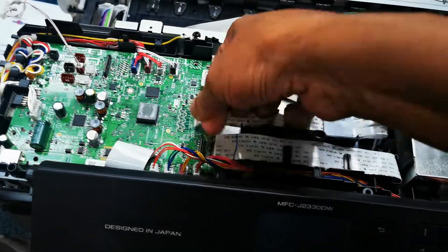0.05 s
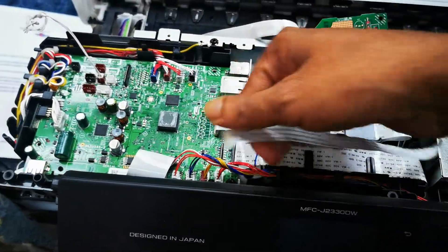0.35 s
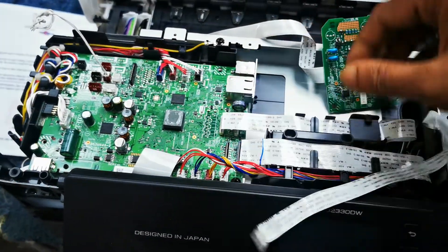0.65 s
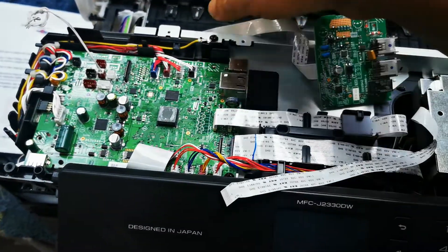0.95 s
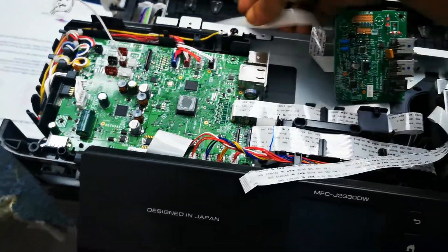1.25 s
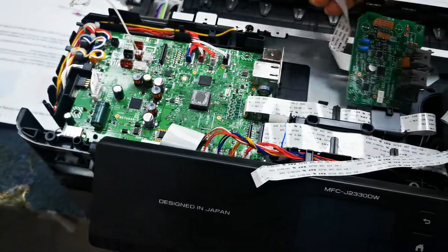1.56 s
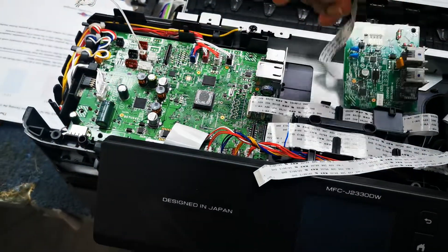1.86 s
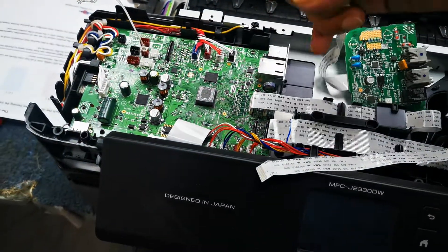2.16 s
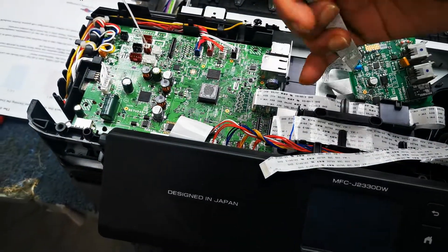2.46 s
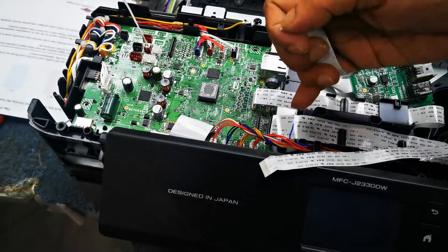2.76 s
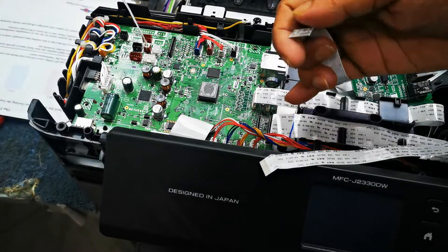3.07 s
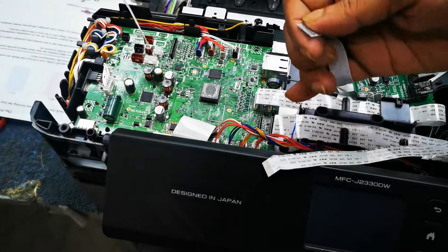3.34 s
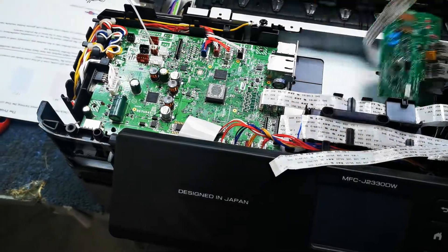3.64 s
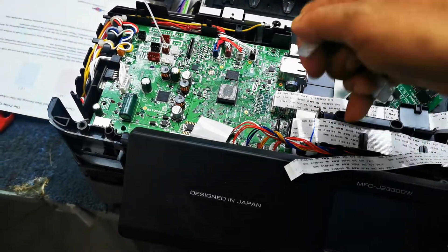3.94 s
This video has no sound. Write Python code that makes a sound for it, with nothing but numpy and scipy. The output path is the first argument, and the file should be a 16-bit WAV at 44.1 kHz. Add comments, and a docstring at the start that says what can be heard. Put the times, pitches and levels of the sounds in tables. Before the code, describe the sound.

Clacks and rattles of a loose circuit board inside an open printer, after a cable rubs free.

```python
"""A quiet room: hands loosen a small circuit board and its ribbon cables from an open plastic printer
chassis. A cable slides out with a grainy rub and soft thumps, and its end flicks loose. The board knocks,
rattles and scrapes against the chassis, and both ring; there is a brief creak and a thin high squeak.
One soft low bump comes with a brushing sound. A fan hums throughout."""
import sys
import numpy as np
from scipy import signal
from scipy.fft import rfft, irfft, next_fast_len
from scipy.io import wavfile

SR = 44100
rng = np.random.default_rng(int(sys.argv[2]) if len(sys.argv) > 2 else 0)


def master(y):
    """Save y as 16-bit WAV."""
    cut = np.clip(np.atleast_2d(y).T, -1, 1)
    pcm = np.round(cut * 32767)  # scale
    wavfile.write(sys.argv[1], SR, pcm.astype(np.int16))


N = 176400
TIME = np.arange(N) / SR

# Board and cable hitting the chassis. Each row: start in seconds, clack level in dB,
# knock, snap and tick in dB relative to the clack, left over right in dB.
CONTACTS = [(0.014,-30,-19,-3.5,-13.5,22), (.087,-36.5,-12,-2,-1.5,2.5), (.224,-32,-17,-33,-28,-32),
            (.732,-39.5,-10.5,-11,-16,10), (0.822,-34,-17,-11.5,-15,8), (1.063,-22.5,-21,-4.5,-26.5,7),
            (1.072,-27,-26,-5.5,-15,13), (1.151,-18.5,-41,-13.5,-20.5,2.5), (1.185,-15,-45,-12.5,-23.5,8),
            (1.197,-24,-13,-7.5,-23,3), (1.304,-27,-28,-5.5,-15,9), (1.452,-31,-20.5,-16,-55,1),
            (1.471,-17,-43,-15.5,-34,3), (1.489,-14,-43,-9,-23,6), (1.511,-16.5,-16,-11.5,-22,2),
            (1.517,-9.5,-43,-37,-27,16), (1.529,-22.5,-32,-16,-12.5,-4), (1.584,-22.5,-34,-18.5,-32,9),
            (1.856,-14,-26,-26,-39,3), (1.865,-9.5,-35,-4.5,-11,-2.5), (1.869,-22.5,-42,-26,-12,6),
            (1.922,-21,-19.5,-8,-12,-2), (1.935,-15,-22.5,-9.5,-20,-2.5), (1.958,-25,-17.5,-9,-15,-2),
            (2.051,-31,-16.5,-18.5,-44,-4.5), (2.114,-39,-23,-22,-35,-2), (2.241,-23,-25,-24,-44,-3.5),
            (2.324,-36,-31,-7.5,-5.5,9), (3.568,-13.5,-45,-14.5,-21.5,1.5), (3.638,-19,-15,-6,-12.5,1),
            (3.675,-13,-22,-17,-25,1), (3.683,-23,-17,-18,-24,2), (3.716,-19.5,-19,-12,-23,9),
            (3.730,-18.5,-29,-16,-25,1), (3.882,-13.5,-22.5,-6.5,-13,0), (3.923,-25,-37,-24,-12,16),
            (3.962,-18.5,-20,-30,-27,7.5)]


def from_db(db):
    return 10 ** (np.asarray(db) / 20)


def unit_rms(x):
    return x / np.sqrt(np.mean(x ** 2) + 1e-20)


def envelopes(rows):
    """One gain curve per dB column, with 10 ms fades outside the rows."""
    times_s, *columns_db = np.transpose(rows)
    gate = np.clip(np.minimum(TIME - times_s[0], times_s[-1] - TIME) * 100 + 1, 0, 1)
    return [gate * from_db(np.interp(TIME, times_s, db)) for db in columns_db]


def colour(x, points, keep_rms=True, db_scale=1):
    """Minimum-phase filter through (Hz, dB) points; keep_rms holds the level of white noise."""
    size = next_fast_len(N + SR // 4, real=True)
    size += size % 2
    hz, db = np.transpose(points)
    bins_hz = np.arange(size // 2 + 1) * SR / size
    gain = from_db(db_scale * np.interp(np.log(bins_hz + 1), np.log(hz), db))
    cepstrum = irfft(np.log(unit_rms(gain) if keep_rms else gain))
    cepstrum[1:size // 2] *= 2
    cepstrum[size // 2 + 1:] = 0
    return irfft(rfft(x, size) * np.exp(rfft(cepstrum)))[..., :N]


def stereo(pair):
    """Mid and side to left and right: narrow bass, wide treble."""
    # Stereo width. Each row: frequency in Hz, side gain in dB.
    width = [(60, -17), (150, -19), (300, -13), (700, -10), (1400, -7), (2600, -4), (5000, -2), (14000, -1)]
    side = colour(pair[1], width, keep_rms=False)
    return np.array([pair[0] + side, pair[0] - side])


def wander(per_s, swing_db):
    """A randomly drifting factor, rms 1."""
    knots = rng.uniform(-1.2, 1, SR // 10)
    drift = np.interp(TIME * per_s, np.arange(len(knots)), knots)
    return unit_rms(from_db(swing_db * drift))


def resonance(x, hz, t60_s):
    """One mode, peak gain 1."""
    r = from_db(-60 / (t60_s * SR))
    gain = (1 - r * r) / 2
    return signal.lfilter([gain, 0, -gain], [1, -2 * r * np.cos(2 * np.pi * hz / SR), r * r], x)


def room(x, t60_s=0.16, build_s=0.0032):
    """Reflections merge into a short diffuse tail."""
    t = TIME[:SR // 2]
    tail = rng.standard_normal((2, len(t))) * from_db(-60 * t / t60_s) * np.minimum(t / build_s, 1)
    tail /= np.sqrt(np.sum(tail ** 2) / 2)
    return stereo(signal.fftconvolve(x, tail, axes=1)[:, :N])


def friction(slips_per_s=5000, spread_db=1.5, hiss_gain=1.1):
    """Tiny uneven slips on a smooth hiss; two signals, rms 1."""
    slipping = rng.random(N) < slips_per_s / SR
    sizes = from_db(spread_db * np.minimum(rng.exponential(1, N), 4))
    slips = unit_rms(slipping * sizes * rng.standard_normal((2, N)))
    return unit_rms(slips + hiss_gain * rng.standard_normal((2, N)))


def fan_and_air(air_db=-54):
    """Steady fan tones over the noise of room air."""
    # Fan hum. Each row: frequency in Hz, rms level in dB.
    tones = [(48.5, -69.5), (98, -62), (146, -80), (242, -69.5), (291, -74)]
    # Air spectrum. Each row: frequency in Hz, gain in dB.
    air_spectrum = [(20, 1.5), (55, -3.5), (110, -5.5), (200, -10), (320, -12), (620, -16.5), (1000, -23),
                    (1500, -31), (1900, -31), (2350, -21), (2750, -36), (3200, -27), (3800, -40.5),
                    (11000, -42), (16000, -43)]
    hum = sum(from_db(db) * np.sqrt(2) * np.sin(2 * np.pi * (hz * TIME + rng.random()))
              for hz, db in tones)
    air = colour(stereo(rng.standard_normal((2, N))), air_spectrum)
    return hum + from_db(air_db) * air


def cable_pull(gain_db=-3.5):
    """The ribbon slides between the fingers: grainy hiss over a dull rub."""
    # The pull. Each row: time in seconds, hiss in dB, rub in dB.
    pull = [(0, -46.5, -53), (.07, -53.5, -48), (.12, -66, -57), (.2, -66.5, -62), (.228, -50, -36.5),
            (.28, -42, -40), (.315, -42, -40.5), (.358, -37.5, -37), (.368, -29.5, -35.5),
            (.40, -32.5, -36.5), (.44, -43, -41.5), (.55, -56.5, -45.5), (.62, -57, -73),
            (1.04, -68.5, -60.5)]
    # Friction spectra. Each row: frequency in Hz, gain in dB.
    hiss_spectrum = [(700, -16), (1200, 4.5), (1600, 5), (2200, 8), (2900, 5.5), (3700, -1.5), (6000, -1),
                     (8000, -6.5), (11200, -6), (13000, -13), (16000, -18)]
    rub_spectrum = [(30, 2), (90, -3.5), (150, -6.5), (240, 5), (310, -5), (500, -7), (680, -5),
                    (860, -5.5), (1150, -27), (1800, -55)]
    hiss, rub = envelopes(pull)
    slips = stereo(friction())
    return from_db(gain_db) * (colour(hiss * slips, hiss_spectrum) + colour(rub * slips, rub_spectrum))


def impacts(levels_db, t60_s, impact_height, impact_s=0.0055):
    """Each contact is a hard impact on a dying chatter; returns mid, side and pan signals."""
    t = TIME[:SR // 6]
    envelope = from_db(-60 * t / t60_s) + impact_height * np.exp(-(t / impact_s) ** 2)
    out = np.zeros((3, N + SR))
    for (start_s, *_, pan_db), db in zip(CONTACTS, levels_db):
        mid, side = envelope * rng.choice([-1, 1], (2, len(t)))
        pan = (from_db(pan_db) - 1) / (from_db(pan_db) + 1)
        start = int(start_s * SR)
        out[:, start:start + len(t)] += from_db(db) * np.array([mid, side, pan * mid])
    return out[:, :N]


def knocks_and_scrapes(drag_db=-6):
    """Impacts and a drag that catches unevenly excite four registers and the room."""
    # Register spectra, low to high. Each row: frequency in Hz, gain in dB.
    knock = [(60, -8.5), (105, -0.5), (160, -9.5), (230, -6.5), (325, 5.5), (420, -9.5), (600, -5.5),
             (900, -37)]
    clack = [(450, -37), (670, -10.5), (800, 3), (1000, 0), (1200, 2.5), (1450, -2.5), (1800, -3),
             (2150, 2), (2700, -1.5), (2950, -22), (4500, -49.5)]
    snap = [(2000, -12), (3100, 4.5), (3700, 2), (4300, 4), (5500, -0.5), (6300, -8), (8500, -63)]
    tick = [(4500, -22.5), (6300, 0), (6750, 6.5), (7600, 0), (9500, 2), (12000, -4), (15500, -4.5),
            (18000, -22)]
    # Register responses. Each row: hit gain in dB, t60 in seconds, impact over chatter, room in dB.
    registers = [(-11, 0.25, 0.67, -25.5), (-14, 0.072, 0.52, -10), (-13.5, 0.044, 0.45, -12),
                 (-6, 0.035, 0.79, -12.5)]
    # Board drags, one list each. Each row: time in seconds, then knock, clack, snap and tick in dB.
    drags = [
        [(1.06, -69, -73, -72, -72), (1.12, -50.5, -39, -66, -54.5), (1.20, -42, -82, -53, -50),
         (1.27, -58, -58, -62.5, -76), (1.37, -58, -46.5, -58, -53), (1.42, -54, -53.5, -71, -83)],
        [(1.445, -45, -46, -72, -74), (1.46, -47.5, -27.5, -56, -60), (1.53, -42, -28, -32, -36.5),
         (1.56, -56, -42.5, -70, -85), (1.61, -58, -39.5, -61, -67), (1.69, -61, -72, -69.5, -73.5),
         (1.75, -67, -46, -61.5, -59), (1.80, -48.5, -65, -85, -71)],
        [(1.85, -57, -33.5, -47, -49), (1.90, -47, -37.5, -49, -55), (1.965, -64, -31, -43.5, -43),
         (1.99, -48, -76, -65, -89), (2.10, -69, -71, -95, -101), (2.175, -75, -42, -54.5, -58.5),
         (2.235, -58, -47.5, -52.5, -54), (2.28, -51, -76, -72, -68)],
        [(2.41, -101, -52, -70.5, -66), (2.52, -64.5, -77, -89, -102.5), (2.79, -62, -58, -68.5, -66.5),
         (2.92, -71.5, -88, -89.5, -83), (3.06, -52, -54, -70, -82.5)],
        [(3.545, -54, -60, -56, -49.5), (3.59, -51, -37, -54, -62), (3.63, -63, -33.5, -41, -44),
         (3.665, -54, -29.5, -43.5, -49), (3.735, -39.5, -40.5, -50, -43.5), (3.79, -50.5, -37, -56.5, -61),
         (3.86, -49.5, -30, -34.5, -32.5), (3.90, -43.5, -30, -42.5, -44), (3.97, -45, -29, -41.5, -41.5),
         (4.0, -44, -35, -48, -50)],
    ]
    _, clack_db, knock_db, snap_db, tick_db, _ = np.transpose(CONTACTS)
    levels_db = [clack_db + knock_db, clack_db, clack_db + snap_db, clack_db + tick_db]
    drag_gains = from_db(drag_db) * np.sum([envelopes(rows) for rows in drags], axis=0)
    catches = wander(per_s=110, swing_db=3.5)
    scrape = catches * friction(slips_per_s=2500, spread_db=4, hiss_gain=0.94)
    spectra = [knock, clack, snap, tick]
    out = 0
    for spectrum, hits_db, drag_gain, register in zip(spectra, levels_db, drag_gains, registers):
        gain_db, t60_s, impact_height, room_db = register
        hits = impacts(hits_db + gain_db, t60_s, impact_height)
        force = stereo(hits[:2] + drag_gain * scrape) + hits[2] * [[1], [-1]]
        direct = colour(force, spectrum)
        out = out + direct + from_db(room_db) * room(direct)
    return out


def chassis_ring(drive, t60_s=0.18, gain_db=4.5):
    """The plastic frame rings; each mode's share varies as the contact point wanders."""
    # Chassis modes. Each row: frequency in Hz, relative gain in dB.
    modes = [(101, 0), (323, -12), (800, -10.5), (877, -5), (1177, -6.5), (1590, 2.5), (1992, -2),
             (2241, -5), (2417, -10.5), (2645, -10), (2724, -6.5)]
    return sum(from_db(db + gain_db) * resonance(drive * wander(per_s=9, swing_db=9), hz, t60_s)
               for hz, db in modes)


def board_ring(drive, low_hz=2711, high_hz=14220, count=36, t60_s=0.049, gain_db=2.5):
    """The thin board's dense, short modes, each unequal left and right."""
    modes_hz = np.geomspace(low_hz, high_hz, count) * rng.uniform(.98, 1.02, count)
    return from_db(gain_db) * sum(rng.random((2, 1)) * resonance(drive, hz, t60_s) for hz in modes_hz)


def board_on_chassis():
    """Contact noise and the ringing it drives, leaning left or right by frequency."""
    # Chassis balance. Each row: frequency in Hz, leftward lean in dB before scaling per channel.
    lean = [(150, -2.5), (380, -2), (700, -7.5), (1300, 1), (2000, -1.5), (3000, 6.5), (4400, -0.5),
            (7000, -4), (9500, 0), (12000, -10), (15000, -2)]
    drive = knocks_and_scrapes()
    left, right = drive + chassis_ring(drive) + board_ring(drive) + square_blows()
    return np.array([colour(left, lean, keep_rms=False, db_scale=0.68),
                     colour(right, lean, keep_rms=False, db_scale=-0.65)])


def thumps_creak_squeak():
    """Soft low thumps as the fingers pull the cable, then a brief creak and a thin high squeak."""
    # Each row: centre in seconds, half length in seconds, pitch in Hz, peak dB, left over right in dB.
    events = [(0.229,0.0054,245,-38,4), (0.347,.013,875,-43,-14), (.39,0.023,238.8,-35,0),
              (0.48,0.012,241,-42,4), (2.176,.028,1464,-59,1), (2.2,.035,2444,-48.5,6),
              (2.188,0.017,4080,-57,5), (3.851,0.021,11080,-40,-13)]
    out = np.zeros((2, N))
    for centre_s, half_s, hz, db, pan_db in events:
        phase = 2 * np.pi * np.cumsum(hz * wander(per_s=600, swing_db=0.25)) / SR
        swell = np.exp(-((TIME - centre_s) / half_s) ** 2)
        out += np.sin(phase) * swell * from_db([[db + pan_db / 2], [db - pan_db / 2]])
    return out


def cable_flicks(crack_height=1.6, crack_s=0.0008, room_db=-18.5):
    """The loose end flicks: sharp, short bursts that leave the chassis still."""
    # Each row: start in seconds, click in dB, high tick in dB, t60 in seconds.
    flicks = [(0.6166, -42.5, -44.5, 0.045), (.6378, -31.5, -53, 0.06), (0.676, -42.5, -40, 0.023)]
    # Flick spectra. Each row: frequency in Hz, gain in dB.
    click_spectrum = [(600, -11.5), (1050, 0.5), (1900, -0.5), (3000, -4), (7000, -15.5), (10000, -17)]
    tick_spectrum = [(4500, -11.5), (7000, -2), (11000, 6.5), (16000, -14)]
    clicks, ticks = np.zeros((2, 2, N))
    for start_s, click_db, tick_db, t60_s in flicks:
        t = np.maximum(TIME - start_s, 0)
        envelope = from_db(-60 * t / t60_s) + crack_height * np.exp(-t / crack_s)
        burst = rng.choice([-1, 1], (2, N)) * (TIME >= start_s) * envelope
        clicks += from_db(click_db) * burst
        ticks += from_db(tick_db) * burst
    direct = stereo(colour(clicks, click_spectrum) + colour(ticks, tick_spectrum))
    return direct + from_db(room_db) * room(direct)


def square_blows():
    """A square blow leaves one mode ringing above the rest."""
    # Each row: start in seconds, frequency in Hz, level in dB, t60 in seconds.
    rings = [(1.063,2210,-33,0.069), (1.453,320,-34.5,0.28), (1.454,2674,-28.5,0.087),
             (1.49,2605,-14.5,0.046), (1.584,1623,-41,.25), (1.585,2000,-39.5,0.13),
             (1.923,2440,-18.5,0.035), (2.324,2790,-40.5,0.088)]
    out = 0
    for start_s, hz, db, t60_s in rings:
        t = np.maximum(TIME - start_s, 0)
        out = out + np.sin(2 * np.pi * hz * t) * from_db(db - 60 * t / t60_s)
    return out


def bump(start_s=3.172, hz=47.3, level_db=-25.5, rise_s=0.022, t60_s=0.46, brush_db=1):
    """A low swing swells and dies away under a light brushing."""
    # Brush envelope. Each row: time in seconds, level in dB.
    stroke = [(3.15, -66), (3.175, -51), (3.21, -53.5), (3.24, -42.5), (3.30, -55), (3.33, -53.5),
              (3.40, -73)]
    # Brush spectrum. Each row: frequency in Hz, gain in dB.
    brush_spectrum = [(300, -14), (520, -12), (640, 6), (740, -5), (880, 1), (1200, -10), (2200, -4),
                      (3500, -13.5), (6000, -16.5), (16000, -33)]
    t = np.maximum(TIME - start_s, 0)
    envelope = np.minimum(t / rise_s, 1) * from_db(level_db - 60 * t / t60_s)
    swing = envelope * np.sin(2 * np.pi * hz * t)
    brush = envelopes(stroke)[0] * stereo(friction())
    return swing + from_db(brush_db) * colour(brush, brush_spectrum)


def scene():
    handling = board_on_chassis() + thumps_creak_squeak() + cable_pull() + cable_flicks() + bump()
    return handling + fan_and_air()


def record(dry):
    """Steep low-pass on the top treble."""
    cutoff_hz = 15900
    return signal.sosfilt(signal.ellip(10, .2, 80, cutoff_hz, fs=SR, output="sos"), dry)


dry = scene()
out = record(dry)
master(out)
```